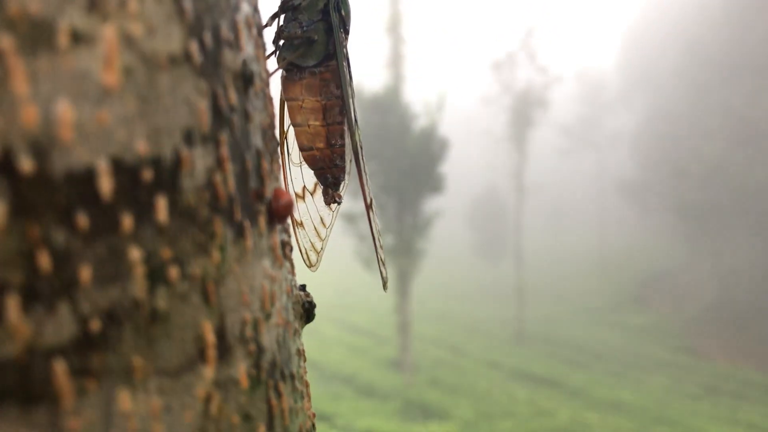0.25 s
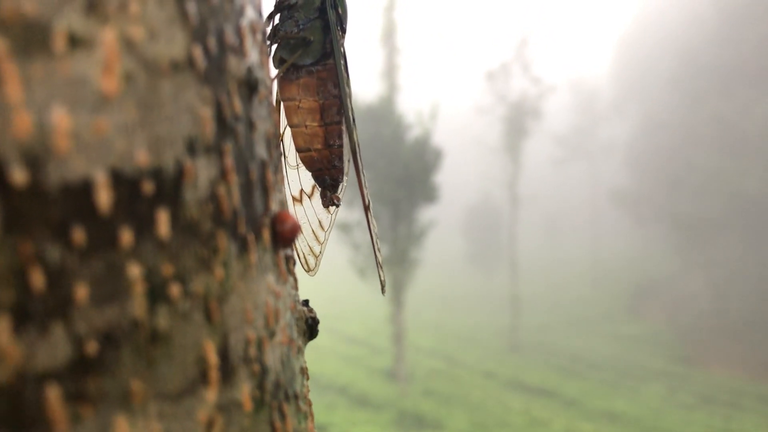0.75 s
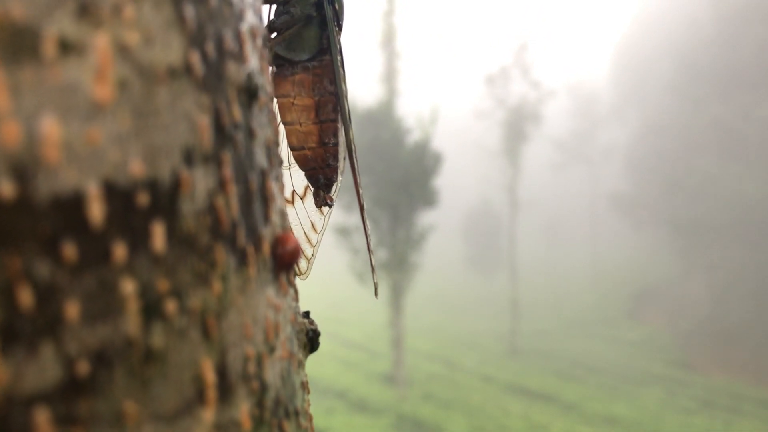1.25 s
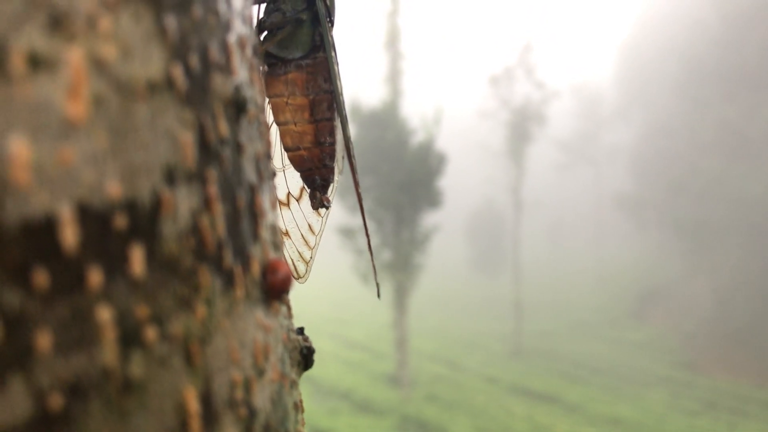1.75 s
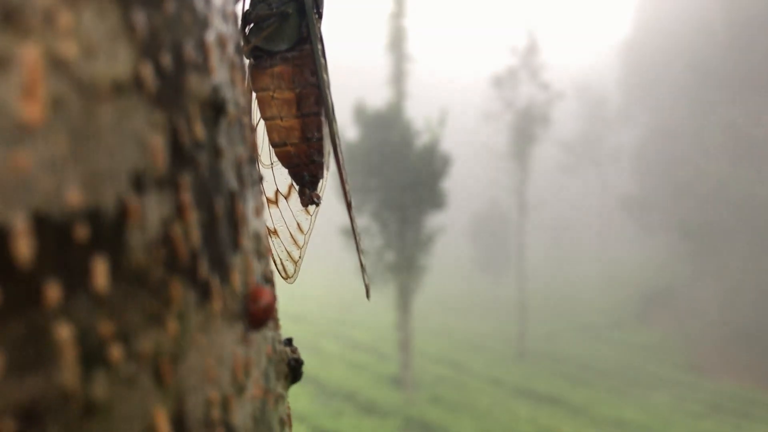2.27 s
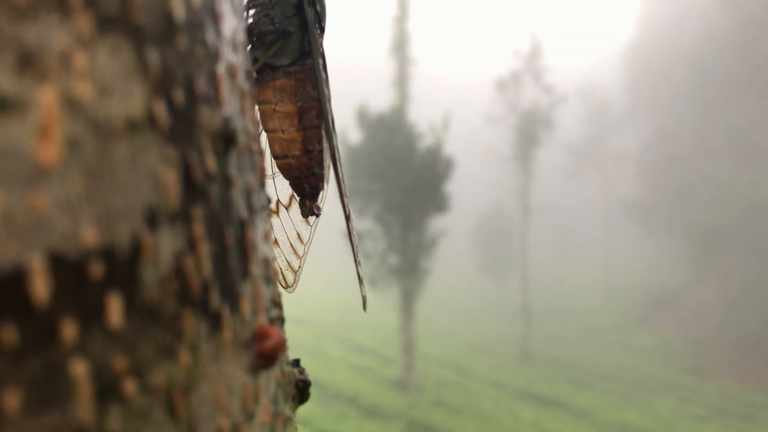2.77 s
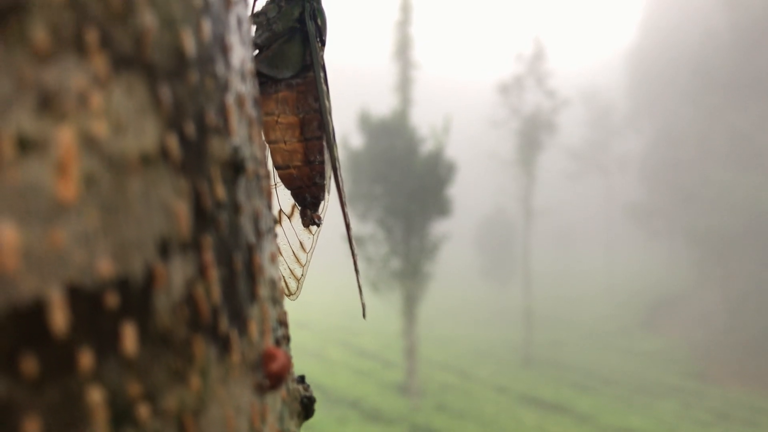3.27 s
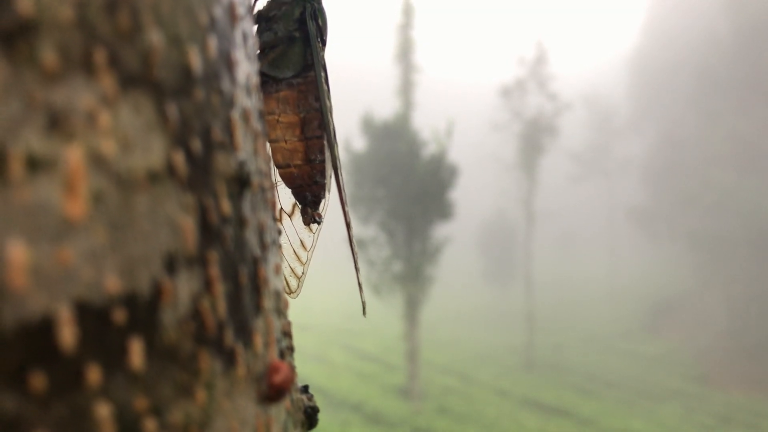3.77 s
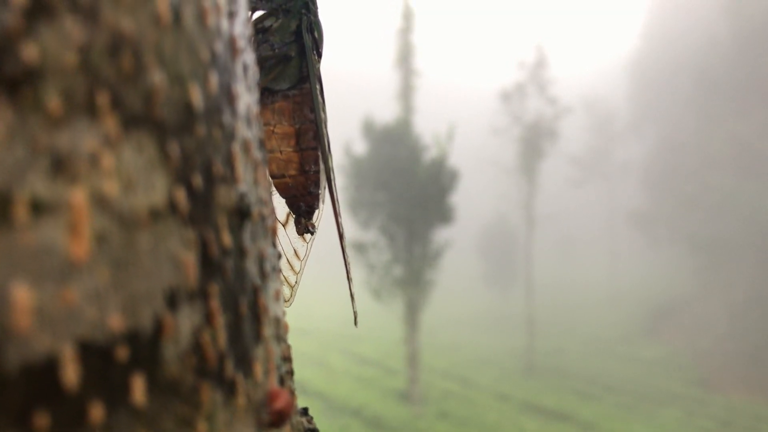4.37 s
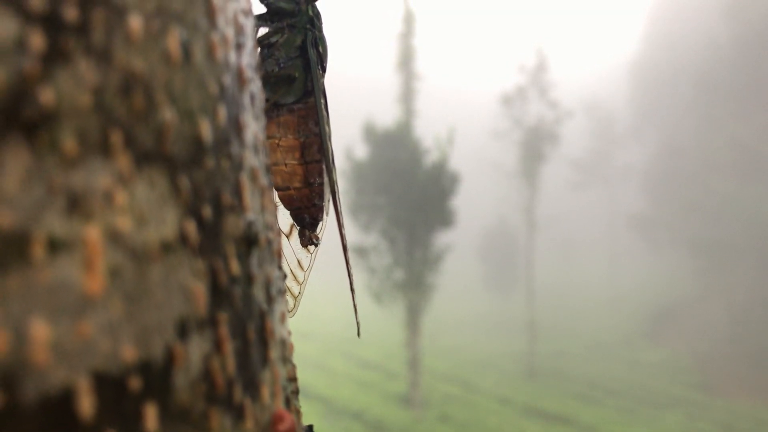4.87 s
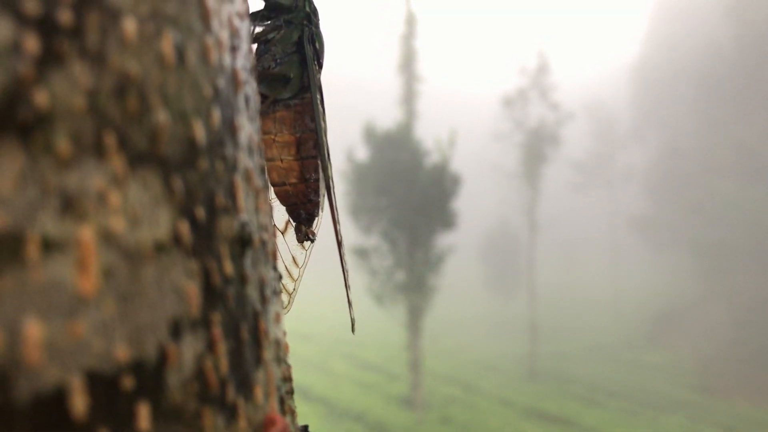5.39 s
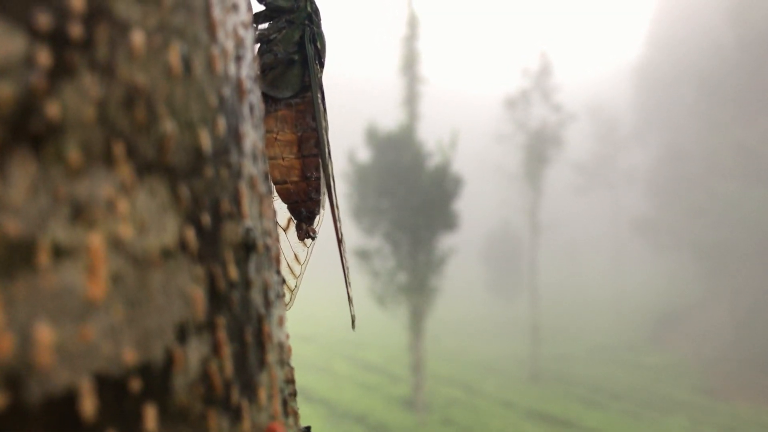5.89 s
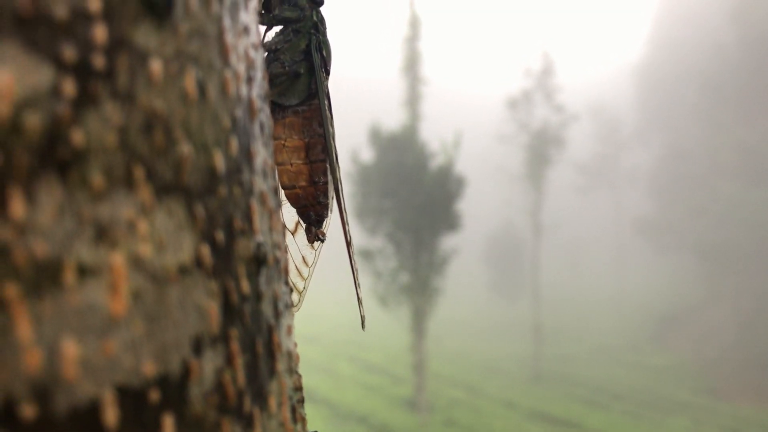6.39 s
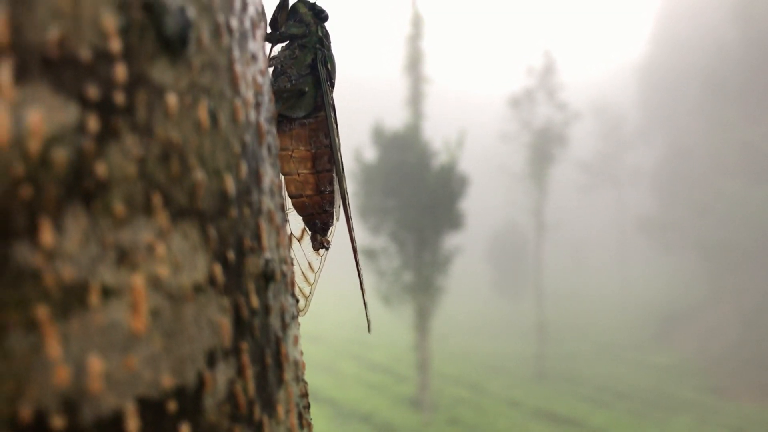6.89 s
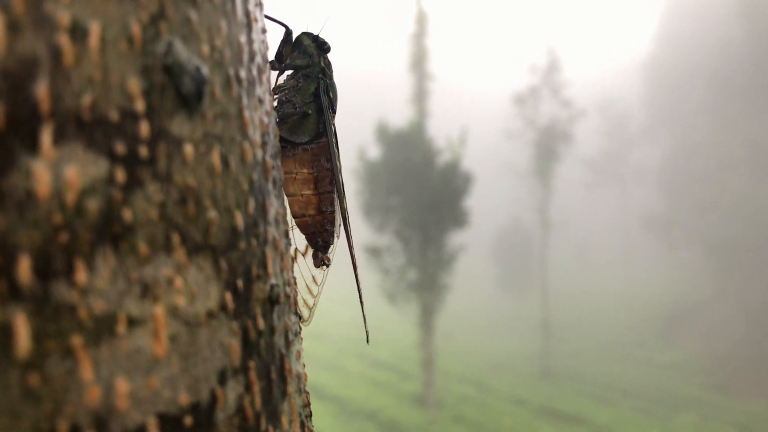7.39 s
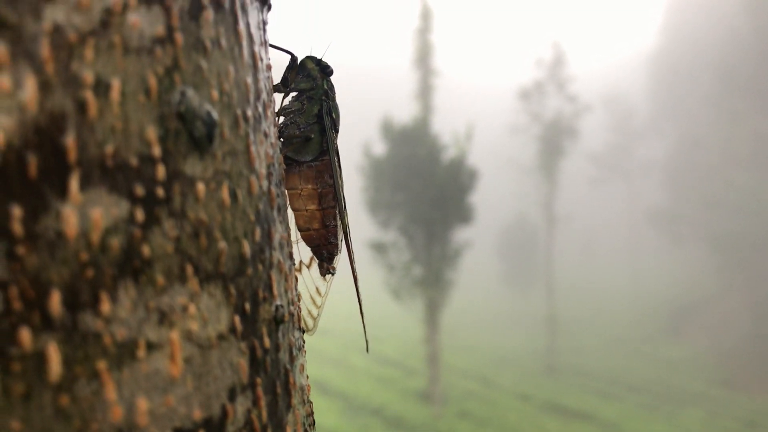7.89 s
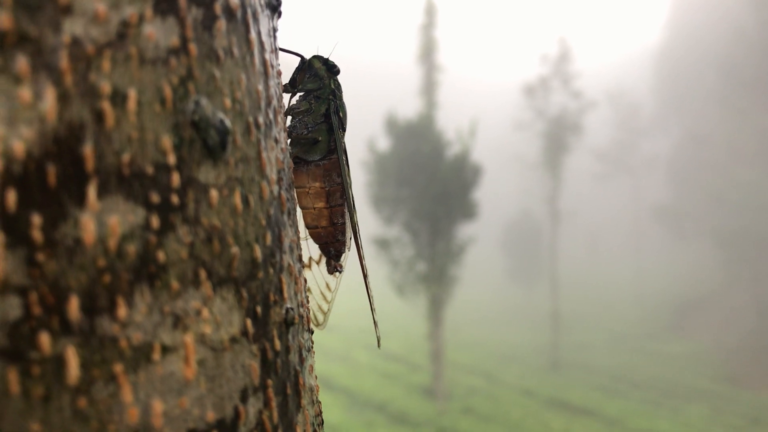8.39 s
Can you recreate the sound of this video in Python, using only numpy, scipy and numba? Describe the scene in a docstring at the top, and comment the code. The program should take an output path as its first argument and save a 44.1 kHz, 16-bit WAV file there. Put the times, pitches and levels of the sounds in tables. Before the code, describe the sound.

From the start, a cicada rattles close to the microphone in short, even bursts, about thirteen a second, making a loud, shrill, pulsing buzz with a crackly edge. The rhythm holds steady, with a few bursts running together. From about 6 seconds the bursts grow denser, and around 7 seconds they rise into a whine. At about 7.5 seconds they merge into a ringing squeal that ends in a rasp and breaks off at 7.7 seconds. The level dips sharply, then recovers as the cicada restarts in halting, uneven stutters until the end at about 8.6 seconds. Throughout, a faint chorus of other cicadas sits far away, with two thin, wavering whistles emerging around 8 seconds. A soft, low wind rumble runs underneath, with brief puffs on the microphone, the clearest near 3.3, 7.4 and 8.5 seconds. The space is open air, with barely any echo from the trees.

```python
"""A cicada rattles close by in short, even bursts; near the end they merge into a ringing squeal,
break off and restart haltingly. Its two tymbals buckle in turn, rib by rib, ringing the tymbal
plate and the hollow abdomen. Trees return a faint tail. Other cicadas call far away, and wind
rumbles and puffs on the microphone. After the squeal the level ducks, then slowly recovers."""
import sys
import numpy as np
from scipy import signal
from scipy.fft import rfft, irfft
from scipy.io import wavfile
from scipy.ndimage import uniform_filter1d, minimum_filter1d
from numba import njit

SR = 44100
rng = np.random.default_rng(int(sys.argv[2]) if len(sys.argv) > 2 else 0)


def pcm_store(signal):
    """Save signal as 16-bit PCM."""
    levels = np.round(np.clip(np.atleast_2d(signal), -1, 1) * 32767)
    wavfile.write(sys.argv[1], SR, levels.astype(np.int16).T)


N = 381465


def cicada(abdomen_gain_db=-15, sizzle_gain_db=-20, haste_db=3):
    """Each click is a run of buckling ribs that rings the abdomen and the tymbal plate."""
    # heard level, ducks sharply after the squeal, then slowly recovers, like automatic gain:
    # (time [s], relative level [dB])
    heard_level = [(0, 0), (2.2, 0), (4.2, -.7), (5.8, -1), (6.5, 0), (7.68, 0), (7.75, -9.5), (8.0, -5),
                   (8.3, -1)]
    clicks = click_times()
    abdomen_hz, width_hz, abdomen_db, plate_db, crackle_db, sizzle_db, rib_rate, slowing = posture(clicks)
    clicks = entrain(clicks, abdomen_hz, width_hz)
    at = np.clip((clicks * SR).astype(int), 0, N - 1)
    heard_db, = in_time(heard_level)
    size = from_db(heard_db[at] + .3 * rng.standard_normal(len(at)))
    haste = np.clip(1 - np.gradient(clicks) / .006, -.5, .5)  # positive for gaps under 6 ms
    rib_times, ribs = buckling_ribs(clicks, size, rib_rate[at], slowing[at], haste)
    # the air sac rings longer and higher as the abdomen stretches
    abdomen = moving_ring(ribs * from_db(abdomen_db + abdomen_gain_db), pole(abdomen_hz, width_hz))
    plate_db = plate_db - haste_db * np.interp(np.arange(N) / SR, clicks, haste)
    plate = tymbal_plate(ribs * from_db(plate_db))
    body = cut(abdomen + plate, hz=8000, kind="low", order=4)
    crackle = from_db(crackle_db) * membrane_crackle(clicks, size)
    stiffest_rib = impulses(rib_times[:, 1], size)
    sizzle = from_db(sizzle_db + sizzle_gain_db) * ring(stiffest_rib, hz=15550, width_hz=390)
    return cut(body + crackle + sizzle, hz=960, kind="high", order=6)  # a small body radiates no bass


def click_times(last_gap_drag=.3, jitter_s=.0001):
    """A burst opens on a long gap, settles, then drags its last click; the two tymbals limp."""
    # click bursts: (start [s], length [s], clicks [count])
    bursts = [(0.0045, 0.0, 1), (0.0194, 0.0409, 8), (0.0929, 0.0501, 10), (0.1673, 0.0518, 11),
              (0.2479, 0.0588, 12), (0.3277, 0.1228, 15), (0.4731, 0.04, 6), (0.5388, 0.0412, 8),
              (0.6136, 0.0444, 9), (0.69, 0.0427, 9), (0.7647, 0.0528, 11), (0.8425, 0.1493, 17),
              (1.0187, 0.0284, 5), (1.084, 0.0436, 7), (1.1608, 0.0496, 9), (1.2379, 0.045, 9),
              (1.3157, 0.0466, 9), (1.3932, 0.0638, 10), (1.4779, 0.0697, 9), (1.5755, 0.0366, 6),
              (1.647, 0.0382, 7), (1.7253, 0.0434, 8), (1.804, 0.0439, 8), (1.8835, 0.0504, 8),
              (1.9546, 0.0681, 8), (2.0464, 0.0476, 7), (2.1253, 0.0367, 7), (2.1985, 0.0466, 9),
              (2.279, 0.0454, 8), (2.3568, 0.0569, 8), (2.4415, 0.0442, 7), (2.5198, 0.037, 7),
              (2.5935, 0.0464, 8), (2.6731, 0.0434, 7), (2.7505, 0.0418, 7), (2.8291, 0.0617, 8),
              (2.9106, 0.0519, 7), (2.9942, 0.0391, 6), (3.069, 0.0424, 7), (3.1463, 0.0391, 7),
              (3.2256, 0.0396, 7), (3.3041, 0.0433, 7), (3.3849, 0.0629, 8), (3.4738, 0.0407, 6),
              (3.5528, 0.0367, 6), (3.6301, 0.0368, 6), (3.7075, 0.0437, 7), (3.7876, 0.0405, 7),
              (3.8624, 0.0399, 6), (3.9391, 0.0406, 6), (4.0225, 0.0363, 6), (4.0987, 0.0377, 7),
              (4.1724, 0.0407, 8), (4.2489, 0.0397, 7), (4.3214, 0.112, 11), (4.4655, 0.0278, 5),
              (4.5374, 0.0369, 7), (4.612, 0.0399, 8), (4.6944, 0.03, 6), (4.7704, 0.0368, 6),
              (4.8257, 0.0, 1), (4.8428, 0.0577, 7), (4.9404, 0.0381, 6), (5.0147, 0.0363, 7),
              (5.0951, 0.0415, 7), (5.1746, 0.0491, 7), (5.2552, 0.0398, 7), (5.3339, 0.0399, 7),
              (5.4133, 0.0417, 7), (5.4936, 0.0419, 7), (5.5699, 0.0373, 7), (5.6464, 0.0454, 8),
              (5.7295, 0.0368, 7), (5.8021, 0.0486, 8), (5.867, 0.0666, 9), (5.9668, 0.0385, 7),
              (6.0377, 0.0407, 9), (6.1108, 0.0392, 9), (6.1853, 0.0473, 10), (6.2576, 0.0458, 10),
              (6.3326, 0.0463, 10), (6.4072, 0.056, 10), (6.4807, 0.0558, 10), (6.5677, 0.0457, 10),
              (6.6399, 0.0565, 13), (6.721, 0.0515, 13), (6.7968, 0.0534, 14), (6.8785, 0.0581, 15),
              (6.9578, 0.0596, 16), (7.0362, 0.0661, 17), (7.1156, 0.0551, 15), (7.1908, 0.051, 14),
              (7.2597, 0.0485, 13), (7.3266, 0.0411, 11), (7.3904, 0.0285, 8), (7.4481, 0.0296, 8),
              (7.505, 0.029, 8), (7.5628, 0.1356, 35), (7.7543, 0.0102, 2), (7.785, 0.0088, 2),
              (7.8108, 0.0336, 4), (7.863, 0.0367, 4), (7.9186, 0.012, 2), (7.9476, 0.0598, 6),
              (8.0793, 0.0388, 5), (8.1959, 0.036, 4), (8.3053, 0.0125, 2), (8.3801, 0.0328, 4),
              (8.4712, 0.0332, 4), (8.5518, 0.0275, 6), (8.6377, 0.0054, 2)]
    # tymbal gait: (time [s], opening gap [s], settling [clicks], long-short limp [ratio])
    gait = [(.7, .0088, 1.3, .07), (1.3, .0076, 2.1, .19), (4.6, .0076, 2.1, .19), (5.0, .0082, .7, .04),
            (6.3, .0074, .9, .06), (6.9, .0052, .7, .1), (7.7, .004, .7, .06), (7.75, .0115, .5, -.12)]
    gait_s, *columns = np.transpose(gait)
    times = []
    for start_s, length_s, count in bursts:
        opening_s, settle, limp = (np.interp(start_s, gait_s, column) for column in columns)
        k = np.arange(round(count) - 1)
        swing = 1 + limp * (-1.) ** k
        unsettled = np.exp(-k / settle)
        lead_s = opening_s * unsettled * swing
        pace = (1 - unsettled) * swing * (1 + last_gap_drag * (k == k.size - 1)) + 1e-9
        gaps_s = lead_s + (length_s - lead_s.sum()) * pace / pace.sum()
        times.append(start_s + np.r_[0, np.cumsum(gaps_s)])
    times = np.concatenate(times)
    return times + jitter_s * rng.standard_normal(len(times))


def posture(clicks, build_s=.025, strain_range_per_s=(150, 195), climax_s=6.5):
    """The body glides between postures; until the climax, runs of quick clicks also strain it."""
    # body postures by name: (abdomen pitch [Hz], abdomen width [Hz], abdomen [dB], plate [dB],
    # crackle [dB], sizzle [dB], rib rate [1/s], slowing per rib [ratio])
    postures = {"fresh": (2320, 260, -5, 2, 0, 0, 2600, .08),
                "settled": (2320, 400, -2, 0, 1.5, 2, 2490, .073),
                "swell": (2160, 740, -1, -1, -2, 0, 2720, .15),
                "whine": (2490, 260, 3.3, .5, -1, 9.5, 2940, .19),
                "squeal": (2610, 120, -2, -1, -.5, -4, 2750, .06),
                "shriek": (2673, 105, -2.5, -3, -4, -5, 2100, -.17),
                "rasp": (2700, 220, 1, 9.5, 2, -2, 2560, -.245),
                "stutter": (2370, 450, -2, 0, -1, 3, 2570, .078)}
    # course of the song: (time [s], posture [name])
    course = [(1.5, "fresh"), (5.9, "settled"), (6.8, "swell"), (7.33, "whine"), (7.47, "squeal"),
              (7.625, "shriek"), (7.66, "rasp"), (7.71, "rasp"), (7.75, "stutter")]
    # offsets at full strain: columns as in postures
    full_strain = (190, -100, 1.5, 2.5, 0, 4, 220, .05)
    clicks_per_s = fade(impulses(clicks, np.ones(len(clicks))), build_s) / build_s
    strain = np.interp(uniform_filter1d(clicks_per_s, size=220), strain_range_per_s, [0, 1])
    strain *= np.clip(climax_s - np.arange(N) / SR, 0, 1)
    unstrained = in_time([(s, *postures[name]) for s, name in course])
    return [column + offset * strain for column, offset in zip(unstrained, full_strain)]


def entrain(clicks, abdomen_hz, width_hz, lock_width_hz=400, lock_above_hz=2450):
    """While the abdomen rings long and high, the tymbals snap in step with its swing."""
    t = np.arange(N) / SR
    cycles = np.cumsum(abdomen_hz) / SR
    nearest_cycle = np.round(np.interp(clicks, t, cycles))
    rings_long = np.interp(clicks, t, width_hz) < lock_width_hz
    rings_high = np.interp(clicks, t, abdomen_hz) > lock_above_hz
    return np.where(rings_long & rings_high, np.interp(nearest_cycle, cycles, t), clicks)


def buckling_ribs(clicks, size, rate_per_s, slowing, haste, rate_spread=.012, spread_db=.4):
    """Rib times and impulses: slowing ribs make a falling chirp, quickening ribs a rising one."""
    # ribs in buckling order: (relative level [dB])
    ribs_db = [-7.5, -1.65, 1.94, -0.43, -0.5, -1]
    rate_per_s = rate_per_s * (1 + .09 * haste + rate_spread * rng.standard_normal(len(clicks)))
    stretch = 1 + slowing + .069 * haste
    gaps_s = stretch[:, None] ** np.arange(len(ribs_db)) / rate_per_s[:, None]
    times = clicks[:, None] + np.cumsum(gaps_s, axis=1) - gaps_s
    gains = from_db(np.array(ribs_db) + spread_db * rng.standard_normal(gaps_s.shape))
    return times, impulses(times, size[:, None] * gains)


def tymbal_plate(ribs):
    """The ribs ring the plate's damped modes, alternating in sign."""
    # plate modes: (frequency [Hz], width [Hz], gain [dB])
    modes = [(1798, 570, -22), (2970, 280, -15.5), (4402, 890, -11), (5330, 2100, -22.5),
             (4360, 2700, -37.5)]
    return sum((-1) ** k * from_db(db) * ring(ribs, hz, width) for k, (hz, width, db) in enumerate(modes))


def membrane_crackle(clicks, size, return_s=.0028, decay_s=.0006):
    """The thin membrane crackles going in and coming out, and springs back with a thin tick."""
    snaps = impulses(clicks, size)
    returns = impulses(clicks + return_s + .00015 * rng.standard_normal(len(clicks)), size)
    # crackle spectrum: (frequency [Hz], relative density [dB])
    spectrum = [(1000, -11.5), (2000, -0.5), (5000, -1.5), (7500, 0.5), (9000, -14), (9800, -5),
                (10400, -15), (11200, -0.5), (12500, -7), (14000, -1.5), (15600, 0.5), (16000, 1),
                (17000, -22)]
    flexing = fade(fade(snaps + from_db(-5) * returns, decay_s), decay_s)
    tick = from_db(-22) * ring(returns, hz=7170, width_hz=300)
    return from_db(-43) * noise(spectrum) * flexing + tick


def trees(x, scatter_db=-32, t60_s=.087):
    """Trunks and foliage scatter back a faint, dull tail."""
    t = np.arange(SR // 2) / SR
    envelope = from_db(-60 * t / t60_s) * (t > .004)
    tail = cut(rng.standard_normal(len(t)), hz=6450, kind="low") * envelope
    return from_db(scatter_db) * signal.fftconvolve(x, tail / np.sqrt(np.sum(tail ** 2)))[:N]


def far_cicadas(chorus_db=-54, waver_hz=60):
    """A soft chorus and two far, wavering whistles, heard louder near the end as the gain recovers."""
    # far insects and open air: (frequency [Hz], relative density [dB])
    chorus = [(200, 7), (500, 2.5), (800, -5), (1500, 0), (2200, -8), (2700, 1), (3400, 3), (4500, 7),
              (6000, -9), (8000, -7), (16000, -7.5)]
    # held whistles: (frequency [Hz], relative level [dB])
    whistles = [(2680, -1), (5540, 0)]
    # heard level of the whistles: (time [s], level [dB])
    heard_level = [(0, -70), (7.8, -65), (8.2, -46), (8.45, -49), (8.65, -48)]
    heard_db, = in_time(heard_level)
    out = from_db(chorus_db) * noise(chorus)
    for hz, db in whistles:
        waver = cut(rng.standard_normal(N) + 1j * rng.standard_normal(N), waver_hz, "low")
        carrier = np.exp(2j * np.pi * hz * np.arange(N) / SR)
        out += from_db(heard_db + db) * rms_one((waver * carrier).real)
    return out


def wind(breeze_gain_db=.5, buffet_db=2, buffet_hz=6, puff_gain_db=-4):
    """A low, buffeting rumble, and short eddies that are brighter the stronger they are."""
    # breeze strength: (time [s], relative level [dB])
    breeze = [(0.0, -48), (0.32, -39), (2.4, -35), (2.56, -52), (2.72, -34), (3.04, -43), (3.2, -32),
              (3.68, -46), (4.0, -26), (4.16, -41), (4.32, -31), (4.64, -41), (5.92, -40), (6.08, -34),
              (7.2, -39), (7.36, -32), (7.68, -49), (8.64, -28)]
    # breeze spectrum: (frequency [Hz], relative density [dB])
    rumble = [(20, -25), (32, -8), (48, 5), (65, 5), (100, -2.5), (150, -14), (220, -22.5), (350, -39),
              (700, -60), (2000, -52)]
    # puffs on the microphone: (start [s], relative level [dB], length [s])
    puffs = [(1.613, -21, 0.02), (1.893, -31, 0.15), (2.308, -20, 0.02), (2.711, -30.5, 0.091),
             (3.262, -16, 0.055), (3.849, -32.5, 0.098), (4.024, -20, 0.033), (6.1, -33, 0.059),
             (6.449, -19, 0.046), (6.779, -28.5, 0.038), (7.397, -14, 0.025), (7.893, -34.5, 0.12),
             (8.247, -28, 0.039), (8.503, -10, 0.036)]
    breeze_db, = in_time(breeze)
    buffet = rms_one(cut(rng.standard_normal(N), buffet_hz, "low"))
    out = from_db(breeze_db + breeze_gain_db + buffet_db * buffet) * noise(rumble)
    for start_s, db, length_s in puffs:
        n, at = int(length_s * SR), int(start_s * SR)
        eddy = cut(rng.standard_normal(SR // 2), hz=255 + 3 * db, kind="low", order=4)
        eddy = cut(eddy, hz=53.7, kind="high")[-n:]
        swell = np.sin(np.pi * np.linspace(0, 1, n) ** .63)
        out[at:at + n] += from_db(db + puff_gain_db) * rms_one(eddy * swell)[:N - at]
    return out


def from_db(db):
    """Decibels to gain."""
    return 10 ** (np.asarray(db) / 20)


def rms_one(x):
    """Scale to rms 1."""
    return x / np.sqrt(np.mean(x ** 2) + 1e-20)


def in_time(rows):
    """Interpolate rows of (time [s], values...) at every sample."""
    s, *columns = np.transpose(rows)
    return [np.interp(np.arange(N) / SR, s, column) for column in columns]


def cut(x, hz, kind, order=2):
    """Butterworth low- or high-pass."""
    return signal.sosfilt(signal.butter(order, hz, kind, fs=SR, output="sos"), x)


def noise(spectrum):
    """Noise of rms 1, shaped by rows of (frequency [Hz], relative density [dB])."""
    hz, db = np.transpose(spectrum)
    bins_hz = np.maximum(np.arange(N // 2 + 1) * SR / N, 1)
    gain = from_db(np.interp(np.log(bins_hz), np.log(hz), db))
    return rms_one(irfft(rfft(rng.standard_normal(N)) * gain, N))


def impulses(times, sizes):
    """One impulse per time, shared between its two nearest samples."""
    at, part = np.divmod(np.clip(times.ravel() * SR, 0, N), 1)
    at, sizes = at.astype(int), sizes.ravel()
    before = np.bincount(at, sizes * (1 - part), N + 2)
    after = np.bincount(at + 1, sizes * part, N + 2)
    return (before + after)[:N] + 1e-18


def fade(x, decay_s):
    """Give every impulse an exponential tail."""
    return signal.lfilter([1], [1, -np.exp(-1 / (decay_s * SR))], x)


def pole(hz, width_hz):
    """Turn and loss per sample of a resonance."""
    return np.exp(np.pi * (2j * hz - np.abs(width_hz)) / SR)


def ring(x, hz, width_hz):
    """Steady resonance: a unit impulse starts a wave of height 1."""
    return signal.lfilter([1], [1, -pole(hz, width_hz)], x).real


@njit
def moving_ring(x, poles):
    """Resonance whose pitch and damping change as it rings."""
    out, state = np.zeros(len(x)), 0j
    for i in range(len(x)):
        state = state * poles[i] + x[i]
        out[i] = state.real
    return out


def scene():
    """Near cicada with its echo, far chorus and wind; mono."""
    song = cicada()
    return (song + trees(song) + far_cicadas() + wind())[None]


def record(dry, ceiling=.7, window_samples=177, cutoff_hz=15900):
    """Fast limiter on the strongest clicks, then a steep low-pass."""
    needed_gain = np.minimum(1, ceiling / (np.abs(dry) + 1e-9))
    gain = uniform_filter1d(minimum_filter1d(needed_gain, window_samples), window_samples)
    return signal.sosfilt(signal.ellip(10, .2, 80, cutoff_hz, fs=SR, output="sos"), dry * gain)


dry = scene()
out = record(dry)
pcm_store(out)
```